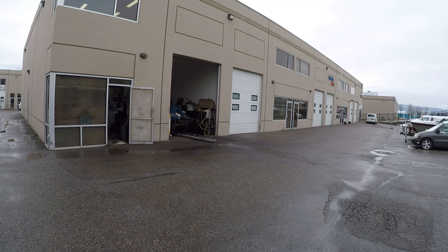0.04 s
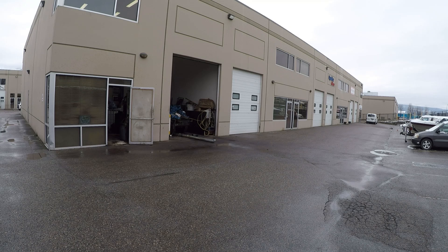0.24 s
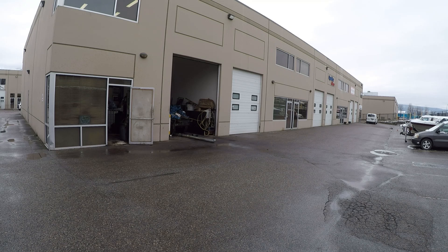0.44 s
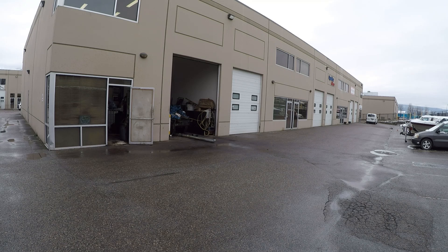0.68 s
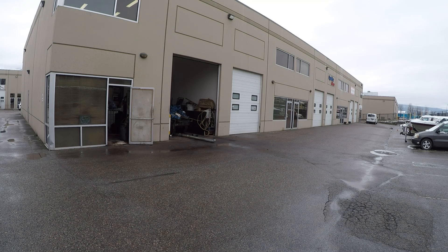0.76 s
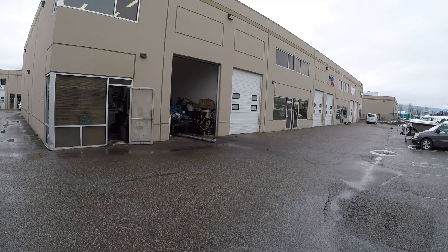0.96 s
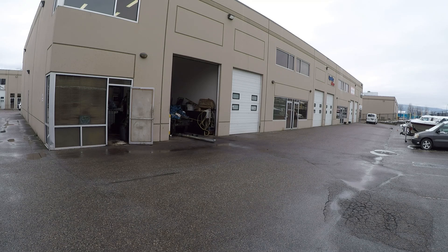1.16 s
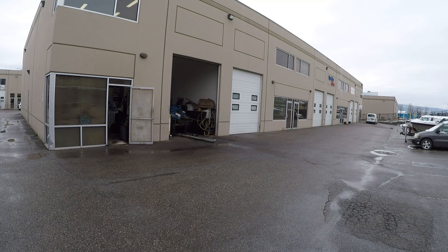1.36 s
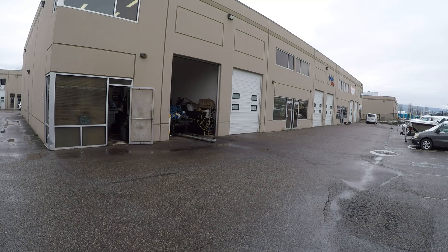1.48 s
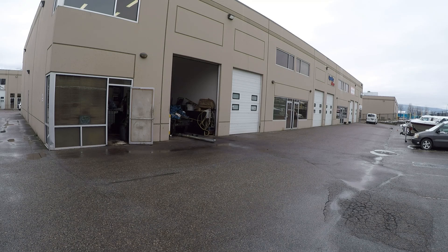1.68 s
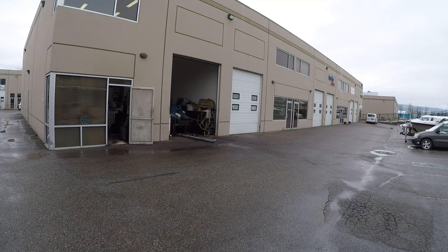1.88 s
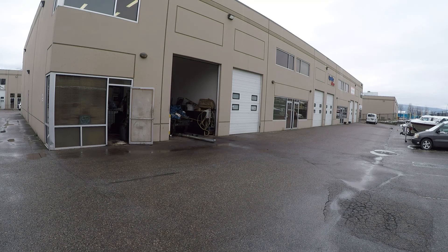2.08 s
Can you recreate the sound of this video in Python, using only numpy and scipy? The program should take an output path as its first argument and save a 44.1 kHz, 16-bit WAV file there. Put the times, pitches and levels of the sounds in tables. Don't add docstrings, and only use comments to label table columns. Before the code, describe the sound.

A four-cylinder diesel engine starts inside a workshop: quiet yard hum, a brief starter whirr, lumpy first firings, a roaring rev-up, then an uneven settling; heard from the wet yard outside with boomy hall echo.

```python
import sys
import numpy as np
from scipy import signal
from scipy.fft import rfft, irfft, next_fast_len
from scipy.io import wavfile
from scipy.ndimage import uniform_filter1d, map_coordinates

SR = 44100
rng = np.random.default_rng(int(sys.argv[2]) if len(sys.argv) > 2 else 0)


def voltage_ratio(level):
    return 10 ** (np.asarray(level, float) / 20)


def wav_record(signal):
    frames = np.transpose(np.atleast_2d(signal))
    bounded = np.clip(frames, -1, 1)
    quanta = np.round(bounded * 32767).astype(np.int16)
    wavfile.write(sys.argv[1], SR, quanta)


N = 94065
T_S = np.arange(N) / SR
BITE_S = .456


def unit(x):
    return x / np.sqrt(np.mean(x ** 2) + 1e-20)


def along(points, hz):
    point_hz, value = np.transpose(points)
    return np.interp(np.log(hz + 1), np.log(point_hz + 1), value)


def wobble(knots_per_s):
    return map_coordinates(rng.standard_normal(400), [np.arange(N) * knots_per_s / SR])


def filtered(x, response):
    size = next_fast_len(N + SR // 2)
    return irfft(rfft(x, size) * response(np.fft.rfftfreq(size, 1 / SR)), size)[:N]


def peak(f, hz, width_hz):
    return 1j * f * width_hz / (hz * hz - f * f + 1j * f * width_hz)


def humps(x, resonances):
    return unit(filtered(x, lambda f: 1 + sum(g * np.abs(peak(f, hz, w)) for hz, w, g in resonances)))


def rush(spectrum, patchy_db):
    z = signal.stft(rng.standard_normal(N + 512), nperseg=512)[2]
    field = uniform_filter1d(rng.standard_normal(z.shape), 6, 0)
    field = uniform_filter1d(field, 8, 1)
    noise = signal.istft(z * voltage_ratio(patchy_db * unit(field)), nperseg=512)[1][:N]
    return unit(filtered(noise, lambda hz: voltage_ratio(along(spectrum, hz))))


def firings():
    # first firing in seconds, its level in dB,
    # fuel starvation at the last cylinder in dB.
    cycles = [(.478, -28, -10), (.7450, -9.5, -3), (.9038, -2, -1), (1.0218, 0, 0), (1.1224, 0, 0),
              (1.2129, 0, 3), (1.3000, 0, 15), (1.3901, -1, 13), (1.4879, -.5, 8), (1.5919, -.5, 9),
              (1.6964, -1, 2), (1.7932, -1, 0), (1.8829, .5, 2), (1.9707, -2, 2), (2.0604, -2, 12),
              (2.1520, -2, 3)]
    starved_share = [0, .1, .35, 1]
    # time in seconds, second puff re first in dB.
    second_puff = [
        (.885, 2),
        (.895, -12),
        (.93, -8),
        (.99, -20),
        (1.1, -60),
    ]
    scatter_db, jitter_s, travel_s, second_after_s = .6, .0003, .0083, .007

    start_s, db, starve_db = np.transpose(cycles)
    padded_s = np.pad(start_s, 4, mode="reflect", reflect_type="odd")
    firing = np.arange(4 * len(start_s) - 4)
    cycle = firing // 4
    chance = rng.standard_normal((len(firing), 2))
    time_s = map_coordinates(padded_s, [4 + firing / 4])
    at = np.round((time_s - travel_s + jitter_s * chance[:, 0]) * SR).astype(int)

    loss_db = starve_db[cycle] * np.tile(starved_share, len(start_s) - 1)
    first = voltage_ratio(db[cycle] - loss_db + scatter_db * chance[:, 1])
    second = first * voltage_ratio(np.interp(time_s, *np.transpose(second_puff)))
    both_at = np.r_[at, at + round(second_after_s * SR)]
    puffs = np.bincount(both_at, np.r_[first, second], 2 * N)[:N]
    lurches = np.bincount(at, second, 2 * N)[:N]
    return puffs, lurches


def exhaust(puffs):
    # frequency in Hz, width in Hz.
    chambers = [(181, 39), (132, 41)]
    suck_hz, suck_width_hz, through = 22, 58, .19

    def silencer(f):
        lowpass = np.prod([hz * hz / (hz * hz - f * f + 1j * f * w) for hz, w in chambers], 0)
        return lowpass * (through - peak(f, suck_hz, suck_width_hz))

    return voltage_ratio(-15.3) * unit(filtered(puffs, silencer))


def knock(puffs):
    # frequency in Hz, width in Hz, gain (linear).
    block_modes = [(273, 53, 0.82), (351, 38, 0.94), (508.8, 18, 1.3), (739.6, 45, 0.49)]
    rung = filtered(puffs, lambda f: sum(g * peak(f, hz, w) ** 2 for hz, w, g in block_modes))
    return voltage_ratio(-35.5) * unit(rung)


def thud(lurches):
    hz, width_hz = 60.4, 32
    return voltage_ratio(-35) * unit(filtered(lurches, lambda f: peak(f, hz, width_hz) ** 2))


def effort():
    # time in seconds, effort in dB.
    effort_points = [(.45, -48.5), (.51, -45.5), (.58, -48), (.68, -50.5), (.92, -48.5), (1.05, -44),
                     (1.18, -42.5), (1.28, -44.5), (1.38, -51), (1.56, -53.5), (1.67, -50.5), (1.78, -45.5),
                     (1.89, -44.5), (2.0, -49.5), (2.12, -51.5)]
    return np.interp(T_S, *np.transpose(effort_points))


def roar(swing_db):
    # frequency in Hz, level in dB per Hz.
    roar_spectrum = [(25, -12), (60, -5), (110, -4), (200, -3), (330, -3), (800, -8), (1300, -22),
                     (2500, -60)]
    # frequency in Hz, width in Hz, gain (linear).
    casing = [(506, 7, 1.2), (723, 13, 0.2), (270, 13, 0.51), (1040, 19, 0.37)]
    unloaded = np.interp(T_S, [0.47, 1.23], [1, 0])
    level_db = -24 + 0.79 * swing_db - 6.5 * unloaded + 1.7 * wobble(4.9)
    return voltage_ratio(level_db) * humps(rush(roar_spectrum, patchy_db=0.5), casing)


def clatter(effort_db):
    # frequency in Hz, level in dB per Hz.
    clatter_spectrum = [(300, -28), (900, -15.5), (1500, -6), (2300, -9.5), (3200, -10), (4300, -23.5),
                        (5200, -40.5), (7000, -44)]
    # frequency in Hz, width in Hz, depth (0-1).
    dips = [(2720, 460, 1), (3420, 150, 1)]
    noise = voltage_ratio(5.5 + effort_db + 0.43 * wobble(25)) * rush(clatter_spectrum, patchy_db=1.87)
    return filtered(noise, lambda f: np.prod([1 - np.clip(d, 0, 1) * peak(f, hz, w) for hz, w, d in dips], 0))


def hiss(swing_db):
    # frequency in Hz, level in dB per Hz.
    hiss_spectrum = [(3000, -20), (4300, 11.5), (5500, -2), (8000, -5), (9700, 1.5), (11000, -15),
                     (13500, -14.5), (15500, -42)]
    closed = np.interp(T_S, [.7, .85], [1, 0])
    level_db = -56.5 + 1.15 * swing_db - 3.5 * closed + .7 * wobble(21)
    return voltage_ratio(level_db) * rush(hiss_spectrum, patchy_db=3.0)


def block():
    rise_s = .01
    effort_db = effort()
    swing_db = effort_db - effort_db.mean()
    turning = np.clip((T_S - BITE_S) / rise_s + 1, 0, 1)
    return turning * (roar(swing_db) + hiss(swing_db) + clatter(effort_db))


def starter():
    # frequency in Hz, level in dB rms.
    motor_tones = [(97, -34.5), (197, -38), (274, -53)]
    off_s, fade_s = 0.58, 0.12
    on = np.interp(T_S, [BITE_S, BITE_S + 0.024, off_s, off_s + fade_s], [0, 1, 1, 0])
    hum = 0
    for hz, db in motor_tones:
        level = voltage_ratio(db + 4 + 2.7 * wobble(6.9))
        hum = hum + level * np.sin(2 * np.pi * hz * T_S + 0.76 * wobble(14.9))
    return on * hum


def solenoid():
    start_s, t60_s, level_db = .43, .7, -58.5
    since_s = T_S - start_s
    spit = rush([(6000, -28), (8500, 1), (9700, 8), (12000, -7)], patchy_db=6)
    return (since_s > 0) * voltage_ratio(level_db - 60 * np.abs(since_s) / t60_s) * spit


def shop(x):
    # frequency in Hz, T60 in seconds.
    decay = [(60, 0.93), (300, 0.91), (2000, 0.37)]
    hz, t, z = signal.stft(rng.standard_normal(SR // 2), SR, nperseg=1024)
    tail = signal.istft(z * voltage_ratio(-60 * t / along(decay, hz)[:, None]), SR, nperseg=1024)[1]
    delayed = np.pad(x, (400, 0))
    return voltage_ratio(-18) * unit(signal.fftconvolve(delayed, tail)[:N]) * np.std(x)


def yard():
    # frequency in Hz, level in dB per Hz.
    yard_spectrum = [(20, -1.5), (160, -8.5), (500, -12), (900, -17.5), (1800, -32.5), (4300, -40),
                     (5800, -51.5), (15000, -55.5)]
    # frequency in Hz, width in Hz, gain (linear).
    hum = [(119.7, 41, 0.61), (173, 27, 2.2), (9700, 3700, 2.4)]
    return voltage_ratio(-34.5 + 1.2 * wobble(24)) * humps(rush(yard_spectrum, patchy_db=0.3), hum)


def scene():
    puffs, lurches = firings()
    pipe = exhaust(puffs) + knock(puffs) + thud(lurches)
    return (pipe + block() + starter() + solenoid() + shop(pipe) + yard())[None]


def top_cut(x):
    return signal.sosfilt(signal.butter(12, 15160, fs=SR, output="sos"), x)


def record(dry):
    ceiling, knee, top_hz, open_s = .9, 4, 12900, .0363
    soft = dry[0] / (1 + np.abs(dry[0] / ceiling) ** knee) ** (1 / knee)
    heard = filtered(soft, lambda f: 1 / (1 + (f / top_hz) ** 12))[None]
    mix = heard * (np.arange(N) >= open_s * SR)
    return top_cut(mix)


dry = scene()
out = record(dry)
wav_record(out)
```